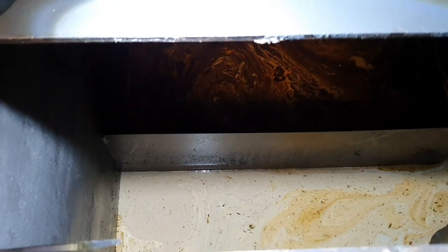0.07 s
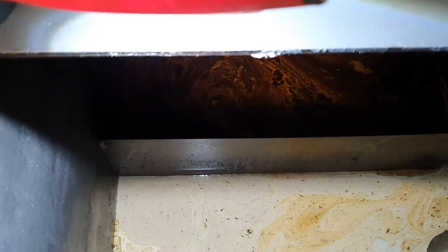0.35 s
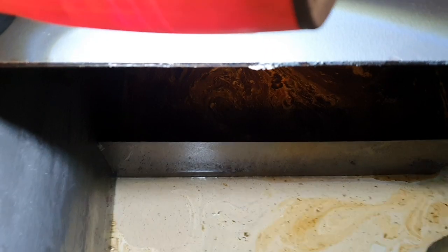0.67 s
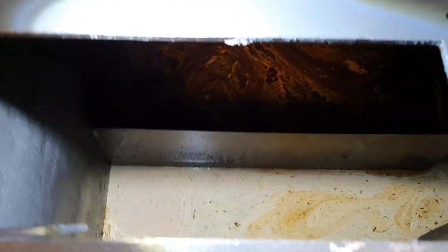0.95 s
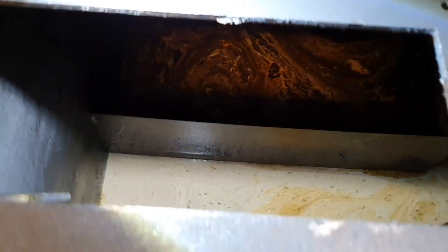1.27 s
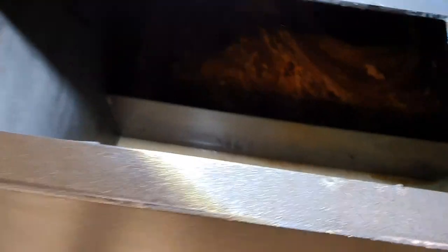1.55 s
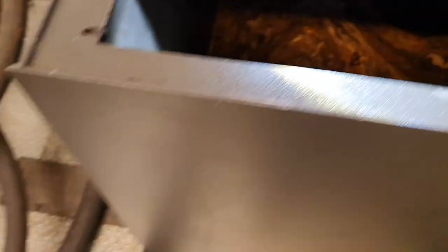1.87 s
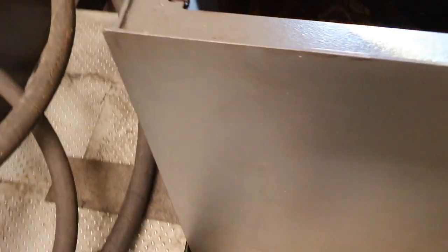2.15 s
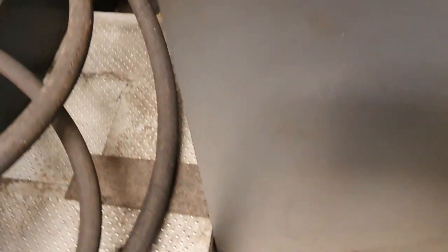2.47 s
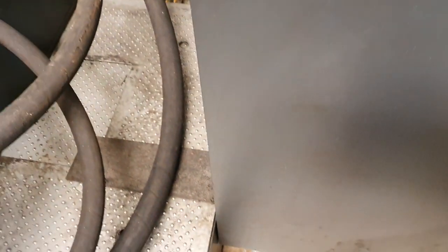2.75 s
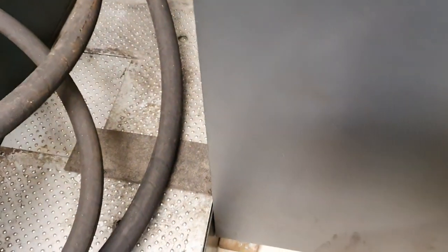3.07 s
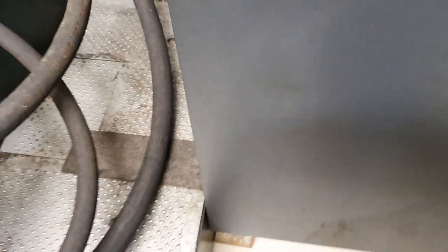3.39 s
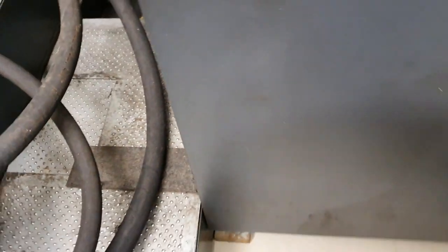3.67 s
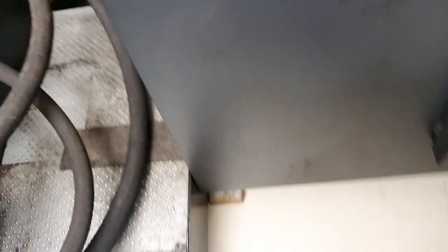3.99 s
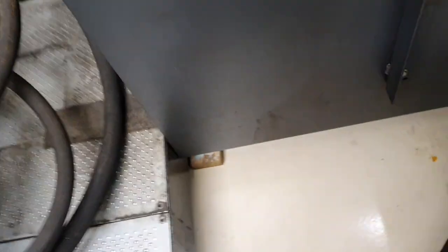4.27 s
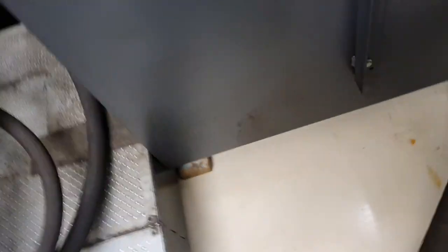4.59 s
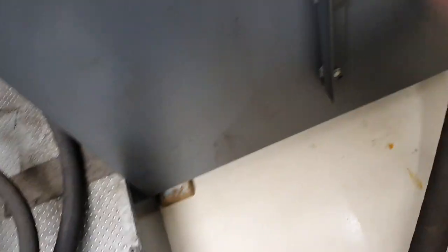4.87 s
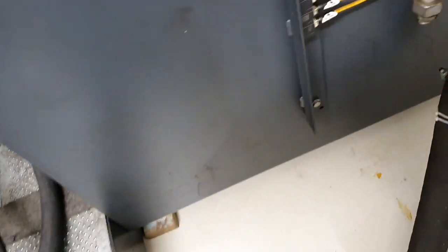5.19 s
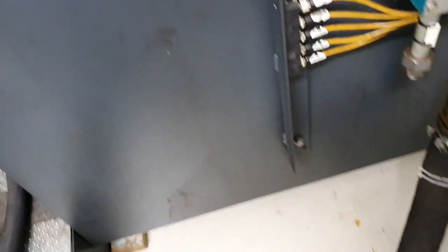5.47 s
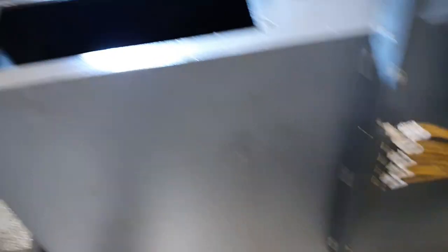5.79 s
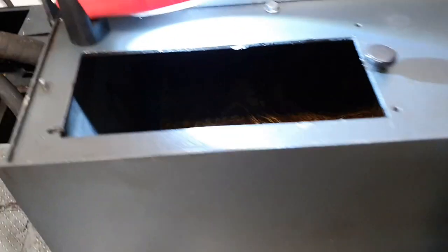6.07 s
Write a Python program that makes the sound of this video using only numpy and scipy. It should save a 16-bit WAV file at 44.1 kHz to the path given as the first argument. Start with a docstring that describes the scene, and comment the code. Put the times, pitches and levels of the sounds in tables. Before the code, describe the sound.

Fingers rub and knock on the microphone, then a shop vacuum clicks on, whines up to speed and rushes loudly, gulping liquid at the end.

```python
"""In a quiet workshop, fingers rub and knock on a camera, and light steps shuffle further off.
At 3.1 s a shop vacuum beside a steel tank clicks on. Its motor hums on the first surge of current
and whines up to speed, and the rush and hiss of the air grow with it.
From about 5.5 s the air in the hose drones, liquid gulps into it, and the nozzle's hiss sinks in pitch."""
import sys
import numpy as np
from scipy import signal
from scipy.fft import rfft, irfft, next_fast_len
from scipy.io import wavfile
from scipy.ndimage import uniform_filter1d, map_coordinates

SR = 44100
rng = np.random.default_rng(int(sys.argv[2]) if len(sys.argv) > 2 else 0)


def wrap_up_sound(samples):
    """Save the sound to the file named by the first command line argument, as 16-bit audio."""
    columns = np.atleast_2d(samples).T
    # keep every value between -1 and 1, then stretch to whole-number steps
    tamed = np.clip(columns, -1, 1)
    steps = np.round(tamed * 32767).astype(np.int16)
    wavfile.write(sys.argv[1], SR, steps)


N = 274743

# Levels are relative. "Side" is left minus right. A "fade time" is the time to fall by 60 dB.
# The workshop's background noise: (frequency [Hz], level [dB])
SHOP_SPECTRUM = [(20, -20), (42, -4.5), (70, -14), (100, -3.5), (130, -6), (250, -7.5), (370, -5),
                 (700, -10), (1130, -16), (1900, -19.5), (6400, -31), (7700, -37.5), (11000, -43),
                 (15500, -55)]
# How long the walls echo: (frequency [Hz], fade time [s])
ECHO_TIMES = [(150, 0.43), (1000, 1), (4000, 1), (12000, 0.21)]
# How alike a noise is on the left and right: (frequency [Hz], likeness [0 to 1])
STEREO_LIKENESS = [(60, 0.92), (250, 0.93), (700, 0.57), (1500, 0.12), (4000, 0.033), (10000, 0)]

# Soft rubs of hand and sleeve: (time [s], half length [s], level [dB], side [dB])
SLEEVE_RUBS = [(.2, 0.62, -61, 23), (.645, 0.05, -49.5, 6), (.86, 0.044, -59, 15), (1.05, 0.058, -62, 13.5),
               (1.185, 0.041, -51, 17.5), (2.93, 0.023, -60, 7)]
# Rubbing cloth: (frequency [Hz], level [dB])
CLOTH_SPECTRUM = [(700, -34), (1200, -6), (2200, -3), (4500, -4.5), (6500, -1.5), (7500, -19), (10000, -11),
                  (13000, -8), (15500, -4)]
# Shuffles and light steps: (time [s], half length [s], level [dB], side [dB])
STEPS = [(1.39, 0.044, -58.5, -11), (1.6, 0.12, -50, 5), (1.734, 0.0021, -55, 5.5), (1.93, 0.11, -59.5, 4),
         (1.977, 0.0052, -50, 2), (2.93, 0.027, -50.5, 5)]
# Shoes on the floor: (frequency [Hz], level [dB])
SHOE_SPECTRUM = [(88, -32), (150, -1), (270, -4), (434, -3), (638, -5), (796, -8.5), (905, -10.5),
                 (2920, -18.5), (12000, -34.5), (15600, -65), (22000, -120)]
# The hand shifts on the camera: (time [s], half length [s], level [dB], side [dB])
HAND_BUMPS = [(.8, 0.23, -58, -4.5), (1.08, 0.019, -50.5, -5.5), (1.143, .012, -47, 2),
              (1.322, 0.011, -34, 8), (1.62, 0.16, -56.5, -3), (2.35, 0.053, -56, -3)]
# The rumble of those bumps: (frequency [Hz], level [dB])
BUMP_SPECTRUM = [(22, -15), (45, -1), (100, -1.5), (170, -18.5), (350, -43)]
# Knocks on the camera and the switch: (time [s], level [dB], fade time [s], side [dB])
KNOCKS = [(0.983, -45.5, .02, 20.5), (1.149, -26.5, 0.062, 14), (1.2067, -21.5, .035, 29),
          (1.244, -27.5, .03, 20.5), (1.255, -24.5, .008, 25), (1.261, -10.5, .02, 32),
          (1.275, -11.5, .02, 28), (1.318, -27, .012, 2), (3.073, -51, .02, 2), (3.101, -29.5, .05, 3),
          (3.109, -24, .06, 10)]
# The knocked case: (frequency [Hz], level [dB])
CASE_SPECTRUM = [(150, -14), (700, -4), (1300, -4), (1800, -7), (3000, -8.5), (4000, -7), (4800, -15.5),
                 (6200, -9), (7600, -29.5), (12000, -14.5), (15500, -29.5)]
# The notes the case rings at: (frequency [Hz], level [dB])
CASE_NOTES = [(1620, -14), (1790, -16)]
# Scraping skin: (frequency [Hz], level [dB])
SKIN_SPECTRUM = [(150, -4), (400, -6), (900, -2), (2200, 0), (3000, -5.5), (4100, -3), (4900, -5),
                 (6300, 0.5), (7500, -21), (9500, -9), (12500, -3), (15500, -7)]
# How far left the scrape sits: (frequency [Hz], side [dB])
SKIN_SIDES = [(100, 1.5), (1300, 12.5), (2400, 21), (4400, 35), (12000, 30)]

# The puff that starts the hose's drone: (frequency [Hz], level [dB])
PUFF_SPECTRUM = [(35, -25), (60, -6), (180, -7), (260, -33.5)]
# Liquid burbling in the hose: (frequency [Hz], level [dB])
BURBLE_SPECTRUM = [(70, -24.5), (140, -7), (240, -17), (280, -20), (335, -6), (420, -19.5), (520, -13.5),
                   (800, -36.5)]
# Gulps of liquid: (time [s], length [s], first pitch [Hz], last pitch [Hz], level [dB])
HOSE_GULPS = [(5.928, 0.088, 193.6, 163, -31.5), (6.058, .18, 137.8, 133.5, -25)]

# Rushing air: (frequency [Hz], level [dB])
RUSH_SPECTRUM = [(450, -19), (720, -1), (1000, 0.5), (1350, 0.5), (2100, 2), (2900, -3.5), (3700, -2.5),
                 (4400, -1.5), (4900, -9), (5350, -7.5), (6200, -11.5), (7000, -14.5), (7450, -29.5),
                 (9000, -47.5)]
# The camera's body shades the rush's treble on the right: (frequency [Hz], side [dB])
RUSH_SIDES = [(700, -6), (1300, -6.5), (2200, -3), (3200, -3.5), (4400, -4.5), (6000, 5.5), (7200, 8.5)]
# The air's high hiss: (frequency [Hz], level [dB])
HISS_SPECTRUM = [(6900, -40), (7500, -5.5), (8300, 2), (10000, 8), (13000, 7), (15000, 1.5), (15800, -5)]
# Where the hiss sits: (frequency [Hz], side [dB])
HISS_SIDES = [(7500, -3), (9000, 0.5), (12000, 2), (15500, 16.5)]
# The low roar of the vacuum's canister: (frequency [Hz], level [dB])
CANISTER_SPECTRUM = [(25, -27), (60, -4), (100, -3), (170, -2), (270, 1), (400, -3), (520, 2), (700, 2.5),
                     (850, -6.5), (1200, -26)]
# How openly the listener faces the air stream: (time [s], level [dB], side [dB])
STREAM_FACING = [(3.5, -0.5, 5), (3.83, 1, 8), (4.2, -1.75, 7), (4.6, -0.85, 7.5), (4.72, 0.5, 10.5),
                 (5.1, 0.83, 16.5), (5.7, -0.25, 14), (6.0, 2.1, 17), (6.23, 0.5, 14.5)]
# The ringing air gap at the nozzle: (time [s], pitch [Hz], strength [dB])
NOZZLE_GAP = [(5.5, 6970, 8), (5.78, 6950, 8), (5.9, 6200, 7.5), (6.03, 5460, 8), (6.13, 4400, 5.5),
              (6.23, 3760, 3.5)]

# The shaft's tone as the listener moves through loud and quiet spots: (time [s], level [dB], side [dB])
WHINE_PATH = [(3.3, -17.5, 4), (3.46, -21.5, 1), (3.58, -19.5, 17), (3.73, -17.5, 2.5), (3.87, -16.5, 2),
              (3.92, -21.5, 10), (4.08, -14.5, 13.5), (4.25, -26.5, 16), (4.38, -17.5, 4),
              (4.56, -18.5, -3), (5.12, -16, -1.5), (5.68, -18.5, 6.5), (6.04, -26, 5), (6.23, -23.5, 35)]
# The seven fan blades' tone swells and fades as the listener moves: (time [s], level [dB])
BLADE_LEVELS = [(3.8, -39), (3.82, -39.5), (4.16, -43.5), (4.21, -50), (5.12, -33), (5.46, -53),
                (5.74, -40.5), (5.83, -52), (5.88, -32), (6.06, -50), (6.09, -29.5), (6.23, -50)]
# Tones of the fan and motor contacts: (pitch [times shaft speed], level [dB], blade swell share [0 to 1])
MOTOR_OVERTONES = [(2, -38.5, 0.08), (2.993, -40.5, 0), (9, -45, 0.088), (11.98, -42, 0.096), (24, -56, 1)]

SWITCH_ON_S, FULL_SPEED_HZ = 3.1, 585.8


def amp(db):
    """Turn decibels into a gain to multiply by."""
    return 10 ** (np.asarray(db) / 20)


def unit(x):
    """Scale x to an average strength (rms) of 1."""
    return x / np.sqrt(np.mean(x ** 2) + 1e-20)


def along(points, hz):
    """Read a (frequency, value) table at hz, with octaves evenly spaced."""
    frequencies, values = np.transpose(points)
    return np.interp(np.log(hz + 1), np.log(frequencies + 1), values)


def clock():
    """The time of each sample in seconds."""
    return np.arange(N) / SR


def curves(rows, t):
    """Read each column after the first at the times t."""
    times, *columns = np.transpose(rows)
    return [np.interp(t, times, column) for column in columns]


def since(start, rise):
    """Rise smoothly from 0 towards 1, beginning at start."""
    return 1 - np.exp(-np.maximum(clock() - start, 0) / rise)


def held(start, rise, hold, fall):
    """A loudness curve that rises, holds and dies away."""
    return since(start, rise) * (1 - since(start + hold, fall))


def wobble(rate):
    """A smooth curve through `rate` random points a second."""
    return map_coordinates(rng.standard_normal(int(N * rate / SR) + 4), [clock() * rate])


def angle(hz):
    """The running phase of a tone whose pitch changes."""
    return 2 * np.pi * np.cumsum(hz) / SR


def pan(db):
    """Left and right gains that keep the total power; positive db leans left."""
    gains = amp(np.array([np.atleast_1d(db), -np.atleast_1d(db)]) / 2)
    return gains / np.sqrt(np.mean(gains ** 2, axis=0))


def filtered(x, response):
    """Multiply each frequency in x by response(hz)."""
    size = next_fast_len(N + SR // 4)
    return irfft(rfft(x, size) * response(np.fft.rfftfreq(size, 1 / SR)), size)[..., :N]


def noise(spectrum, patchy_db):
    """Shaped stereo noise with random louder and softer patches; both sides are alike in the bass."""
    bands = signal.stft(rng.standard_normal((2, N)), nperseg=512)[2]
    patches = uniform_filter1d(rng.standard_normal(bands.shape[1:]), size=5, axis=0)
    patches = uniform_filter1d(patches, size=14, axis=1)
    pair = signal.istft(bands * amp(patchy_db * unit(patches)), nperseg=512)[1][:, :N]

    def colour(hz):
        spread = np.arccos(np.clip(along(STEREO_LIKENESS, hz), -1, 1)) / 2
        return amp(along(spectrum, hz)) * np.array([np.cos(spread), np.sin(spread)])

    mid, side = filtered(pair, colour)
    return unit(np.array([mid + side, mid - side]))


def workshop():
    """The room's quiet background noise, wavering a little."""
    return amp(-54.5 + 1.1 * wobble(5.66)) * pan(4.3) * noise(SHOP_SPECTRUM, patchy_db=1.0)


def room_echo(x):
    """Sound bounces off the walls and dies away, with its own echo on each side."""
    hz, t, bands = signal.stft(rng.standard_normal((2, SR // 2)), SR, nperseg=256)
    decay = amp(-60 * t / along(ECHO_TIMES, hz)[:, None])
    tail = signal.istft(bands * decay, SR, nperseg=256)[1]
    return signal.fftconvolve(np.atleast_2d(x), tail / np.linalg.norm(tail[0]), axes=1)[:, :N]


def from_left(x, lag_s=0.00024):
    """Sound from the left reaches that side a moment sooner."""
    return filtered(x, lambda hz: np.exp(1j * np.pi * hz * lag_s * np.array([[1], [-1]])))


def rustle(rows, spectrum, grain_db):
    """Surfaces rub together in soft swells of grainy noise."""
    swell = sum(amp(db) * pan(side_db) * np.exp(-((clock() - time) / half_length) ** 2 / 2)
                for time, half_length, db, side_db in rows)
    friction = noise(spectrum, patchy_db=0.6)
    return swell * unit(amp(grain_db * wobble(250)) * friction)


def knocks():
    """Each knock is a sharp crack, a short rattle and a ring of the case."""
    hits, rings = np.zeros((2, N)), np.zeros((2, N))
    t = np.arange(SR // 4) / SR
    notes = sum(amp(db) * np.sin(2 * np.pi * hz * t) for hz, db in CASE_NOTES)
    crack = amp(-10 - 60 * t / 0.012)
    for time, db, fade_s, side_db in KNOCKS:
        start = round(time * SR)
        span = slice(start, start + len(t))
        gain = amp(db) * pan(side_db)
        decay = amp(-60 * t / fade_s)
        hits[:, span] += gain * (crack + amp(-12) * decay) * rng.standard_normal((2, len(t)))
        rings[:, span] += gain * decay * notes
    return filtered(hits, lambda hz: unit(amp(along(CASE_SPECTRUM, hz)))) + rings


def finger_slip(slip_at=1.261, hold_s=0.022, fall_db_per_s=748, thump_at=1.277, thump_hz=82):
    """Skin scrapes over the camera's left sound hole and pushes a short, low thump into it."""
    slip_db = -20.5 - fall_db_per_s * np.maximum(clock() - slip_at - hold_s, 0)
    scrape = amp(slip_db + 3 * wobble(900)) * since(slip_at, 0.001) * noise(SKIN_SPECTRUM, patchy_db=2.5)
    age = np.maximum(clock() - thump_at, 0)
    thump = amp(-21.5 - 60 * age / 0.11) * since(thump_at, 0.0014) * np.sin(2 * np.pi * thump_hz * age)
    return filtered(scrape, lambda hz: pan(along(SKIN_SIDES, hz))) - thump * pan(11)


def gulp(start, length, first_hz, last_hz, db):
    """Liquid pulled into the hose makes one sinking, wobbly note."""
    hz = np.interp(clock(), [start, start + length], [first_hz, last_hz]) * (1 + 0.012 * wobble(40))
    loudness = amp(db + wobble(30)) * held(start, 0.02, length, 0.02)
    return loudness * np.sqrt(2) * np.sin(angle(hz))


def hose(start=5.465, drone_hz=81):
    """The air in the hose starts to drone with a puff; then liquid burbles and gulps."""
    drone_db = -29.5 + 3 * (1 - since(start, 0.09))  # starts strongly, then settles
    loudness = amp(drone_db + 1.3 * wobble(25)) * since(start, 0.018)
    drone = loudness * np.sqrt(2) * np.sin(angle(drone_hz + 1.08 * wobble(17)))
    burble = amp(-29) * since(5.9, 0.051) * noise(BURBLE_SPECTRUM, patchy_db=3)
    puff = amp(-27.5) * held(start, 0.005, 0, 0.068) * noise(PUFF_SPECTRUM, patchy_db=2.5)
    return drone + sum(gulp(*row) for row in HOSE_GULPS) + burble + puff


def tank_echoes(x, echo_db=-8, longest_s=0.013, count=12):
    """Quick echoes off the steel tank boost some frequencies and cancel others."""
    delays = longest_s * rng.uniform(0.2, 1, (count, 2, 1))
    gain = amp(echo_db) / np.sqrt(count)
    comb = lambda hz: 1 + gain * sum(np.exp(-2j * np.pi * hz * delay) for delay in delays)
    return unit(filtered(x, comb))


def nozzle(x, width_octaves=0.45, overtone_ratio=2.2):
    """The nozzle's gap rings at two pitches that slide down through the hiss, dulling it above them."""
    hz, t, bands = signal.stft(x, SR, nperseg=512)
    centre_hz, strength_db = curves(NOZZLE_GAP, t)
    octaves = np.log2((hz[:, None] + 1) / centre_hz)
    upper_octaves = octaves - np.log2(overtone_ratio)
    lower_peak = np.exp(-(octaves / width_octaves) ** 2)
    upper_peak = 0.54 * np.exp(-2 * (upper_octaves / width_octaves) ** 2)
    dulling = 0.15 + np.clip(octaves, 0, 0.6) + 3.5 * np.clip(upper_octaves, 0, 1)
    gain = amp(strength_db * (lower_peak + upper_peak - dulling))
    return signal.istft(bands * gain, SR, nperseg=512)[1][:, :N]


def air_stream(speed_share):
    """The air rushes and hisses harder as the fan speeds up, over the canister's low roar."""
    facing_db, side_db = curves(STREAM_FACING, clock())
    flow = np.clip(speed_share / 0.88, 0, 1)  # near full speed the hose limits the flow
    sparks = amp(-9.5) * held(SWITCH_ON_S, 0.0026, 0.022, 0.018)  # the motor's brushes fizz briefly
    rush = tank_echoes(noise(RUSH_SPECTRUM, patchy_db=1.33))
    rush = filtered(rush, lambda hz: pan(along(RUSH_SIDES, hz)))
    rush *= amp(-23 + facing_db) * (flow ** 2.3 + sparks) * pan(side_db)
    hiss = filtered(noise(HISS_SPECTRUM, patchy_db=1.26), lambda hz: pan(along(HISS_SIDES, hz)))
    hiss *= amp(-31 + 1.6 * facing_db) * (flow ** 3.7 + 0.35 * sparks) * pan(0.5 * side_db)
    roar = amp(-32) * speed_share ** 0.23 * pan(1.8) * noise(CANISTER_SPECTRUM, patchy_db=2.5)
    return (nozzle(rush + hiss) + roar) * since(SWITCH_ON_S, 0.0017)


def high_sheen(phase, speed_share, load):
    """A thin, high band of hiss climbs with the shaft and is stronger while the motor works hard."""
    centre = 26.7 * phase
    band = np.array([wobble(450) * np.cos(centre) + wobble(450) * np.sin(centre) for _ in range(2)])
    loudness = amp(-45) * (1 - since(5.8, 0.08)) + amp(-40) * load ** 0.4
    return band * speed_share ** 4 * loudness


def brushes(phase, speed, speed_share, load, bars=12, housing_hz=3360, width_hz=360):
    """The motor's sliding contacts chirp as they pass the housing's own pitch, then rasp under load."""
    bar_phase = bars * phase + 0.9 * wobble(300)
    ringing = amp(-24) * np.exp(-((bars * speed - housing_hz) / width_hz) ** 2)
    chirp = ringing * (np.sin(bar_phase) + 0.3 * np.sin(2 * bar_phase))
    rasp = amp(-21) * speed_share ** 5 * np.sqrt(load) * np.sin(bar_phase)
    sound = (chirp + rasp) * since(SWITCH_ON_S, 0.022)
    return sound + 0.5 * room_echo(sound)


def fluttering_tone(phase, level_db, flutter_db, drift):
    """One tone wavers in level and phase on its way through swirling air."""
    fading_db = np.array([flutter_db * wobble(4.94) + 2.2 * wobble(45) for _ in range(2)])
    wander = drift * np.array([wobble(7) + 0.5 * wobble(70) for _ in range(2)])
    return amp(level_db + fading_db) * np.sqrt(2) * np.sin(phase + wander)


def fan_tones(phase, speed_share, blade_count=7):
    """The fan blades' tone and weaker overtones come out as the shaft nears full speed."""
    blade_db, = curves(BLADE_LEVELS, clock())
    _, side_db = curves(STREAM_FACING, clock())
    swell_db = blade_db - np.median(blade_db)
    drift = 0.5 + 4 * (1 - speed_share)
    blades = fluttering_tone(blade_count * phase, blade_db + 5.5, flutter_db=1, drift=drift)
    overtones = sum(fluttering_tone(multiple * phase, db + share * swell_db, flutter_db=2.5, drift=0.28)
                    for multiple, db, share in MOTOR_OVERTONES)
    return blades * speed_share ** 3 * pan(side_db) + overtones * speed_share ** 5 * pan(5)


def shaft_whine(phase, speed, load, cutoff_hz=243):
    """One wave per turn of the shaft; while it climbs, the tone beats against its own lower echoes."""
    whine_db, side_db = curves(WHINE_PATH, clock())
    escaping = 1 / np.hypot(1, (cutoff_hz / (speed + 1)) ** 10)  # the canister hardly gives off low tones
    direct = np.exp(1j * phase) * since(SWITCH_ON_S, 0.15)
    tone = direct + amp(4) * np.sqrt(load) * room_echo(direct)
    tone *= amp(3.5 * load ** 0.3 * wobble(70))  # the room favours some pitches, so the climb flutters
    strength = np.sqrt(np.abs(uniform_filter1d(np.abs(tone) ** 2, size=SR // 8)) + 0.01)
    return amp(whine_db + 4) * escaping * pan(side_db) * tone.real / strength


def shaft_speed(kick_share=0.151, kick_s=0.0395, spin_up_s=0.217):
    """Turns per second: a quick kick, then a slower climb to full speed."""
    kick = kick_share * since(SWITCH_ON_S, kick_s)
    climb = (1 - kick_share) * since(SWITCH_ON_S, spin_up_s)
    return FULL_SPEED_HZ * (kick + climb)


def motor(speed, speed_share, hum_hz=100):
    """The motor whines up to speed; its current drops, and so does its hum at twice the mains frequency."""
    load = np.clip(1 - speed_share, 1e-4, 1)
    phase = angle(speed * (1 + 0.00042 * wobble(14)))
    hum = (amp(-28.5) * load + amp(-41.5)) * np.sin(2 * np.pi * hum_hz * clock()) * since(3.118, 0.022)
    whine = shaft_whine(phase, speed, load) + fan_tones(phase, speed_share)
    return hum + whine + brushes(phase, speed, speed_share, load) + high_sheen(phase, speed_share, load)


def scene():
    """Mix the handling noises, the quiet workshop and the vacuum."""
    taps = knocks() + finger_slip()
    rubs = rustle(SLEEVE_RUBS, CLOTH_SPECTRUM, grain_db=1.5)
    steps = rustle(STEPS, SHOE_SPECTRUM, grain_db=2)
    bumps = rustle(HAND_BUMPS, BUMP_SPECTRUM, grain_db=0.5)
    background = workshop()
    speed = shaft_speed()
    speed_share = np.clip(speed / FULL_SPEED_HZ, 0, 1)
    vacuum = motor(speed, speed_share) + air_stream(speed_share)
    handling = taps + rubs + steps + bumps
    return from_left(background + vacuum) + hose() + handling + amp(-28.5) * room_echo(taps)


def record(dry, top_hz=15900):
    """Cut off the very highest treble."""
    return filtered(dry, lambda hz: hz < top_hz)


dry = scene()
out = record(dry)
wrap_up_sound(out)
```